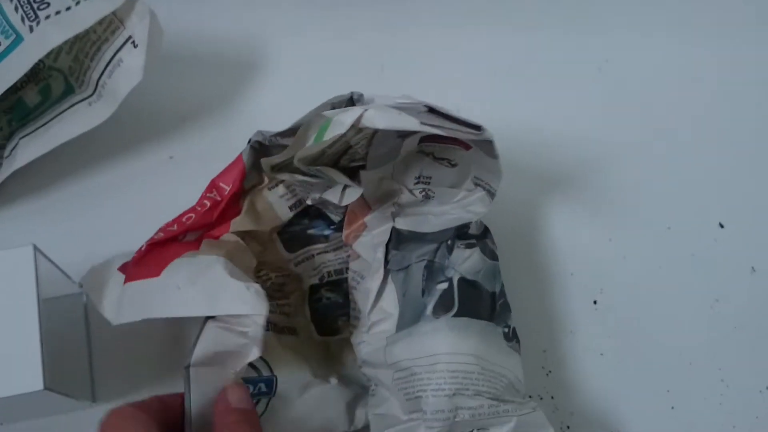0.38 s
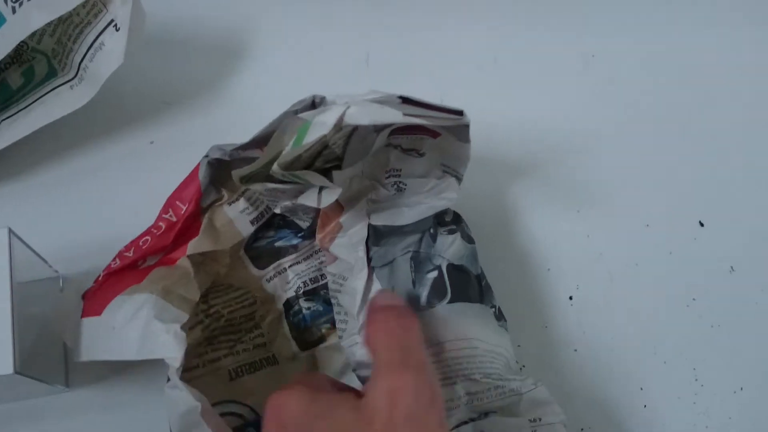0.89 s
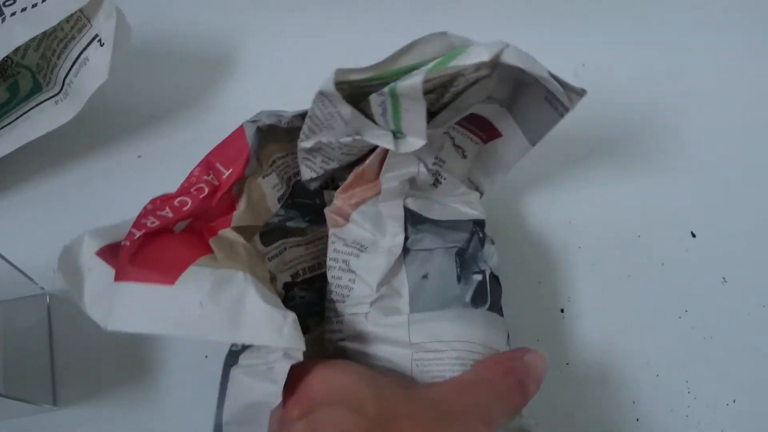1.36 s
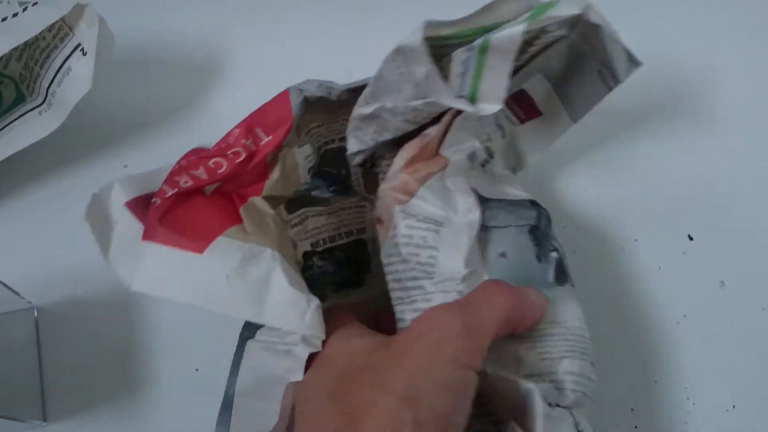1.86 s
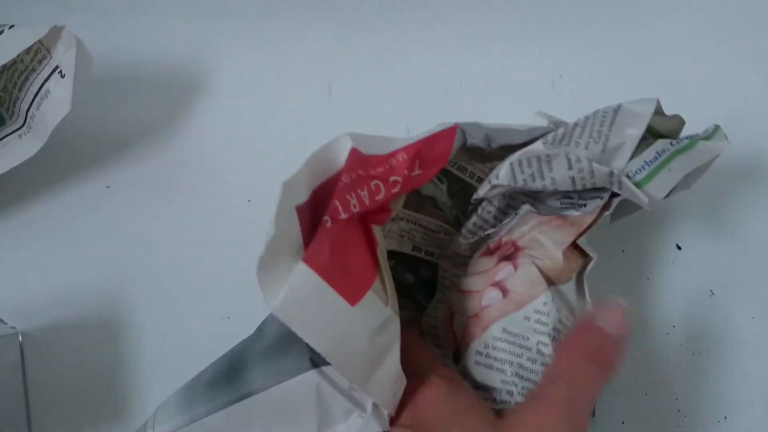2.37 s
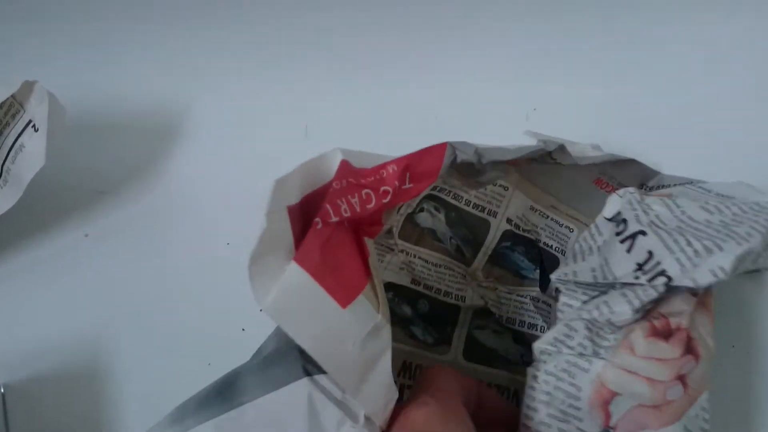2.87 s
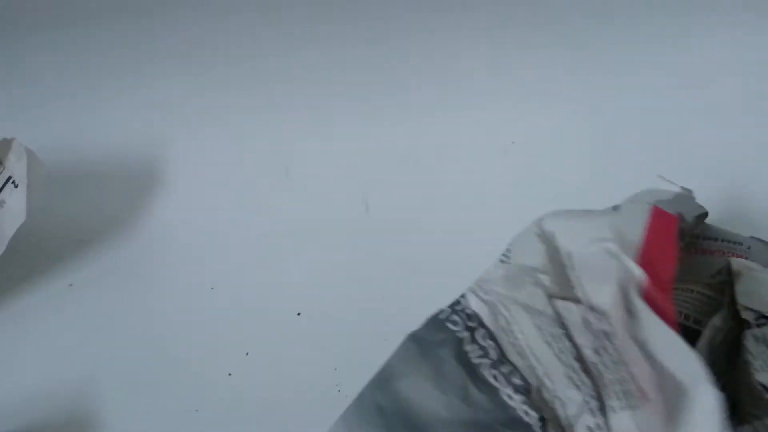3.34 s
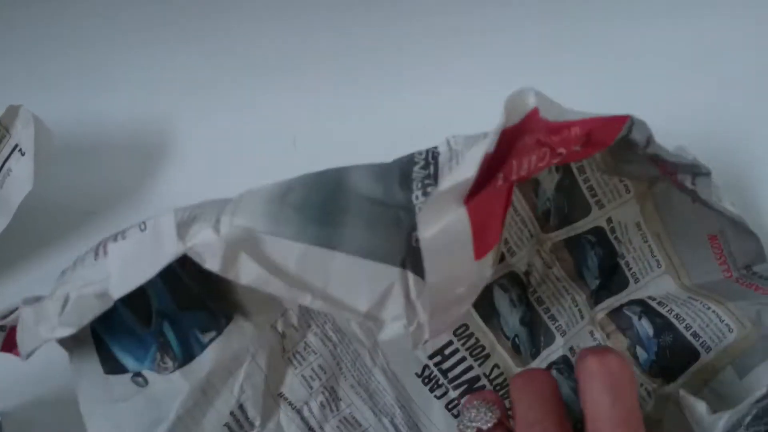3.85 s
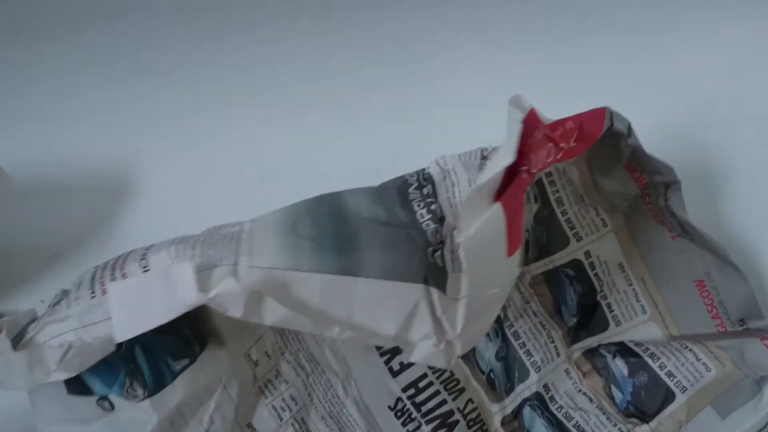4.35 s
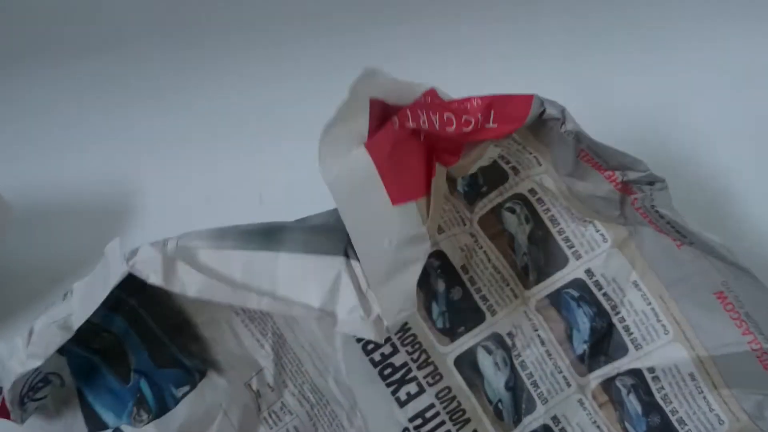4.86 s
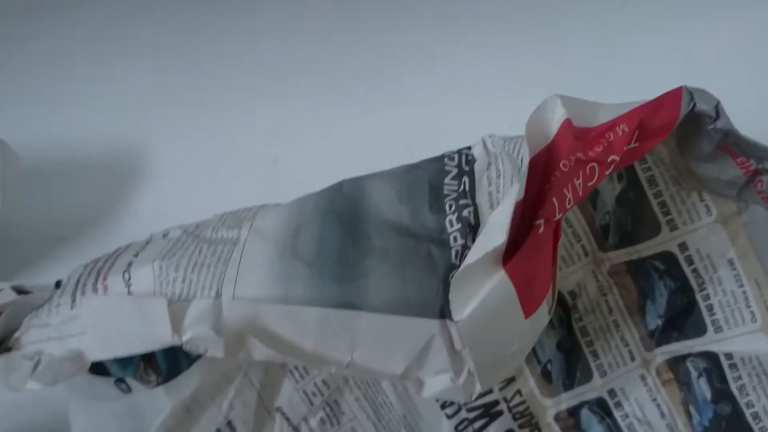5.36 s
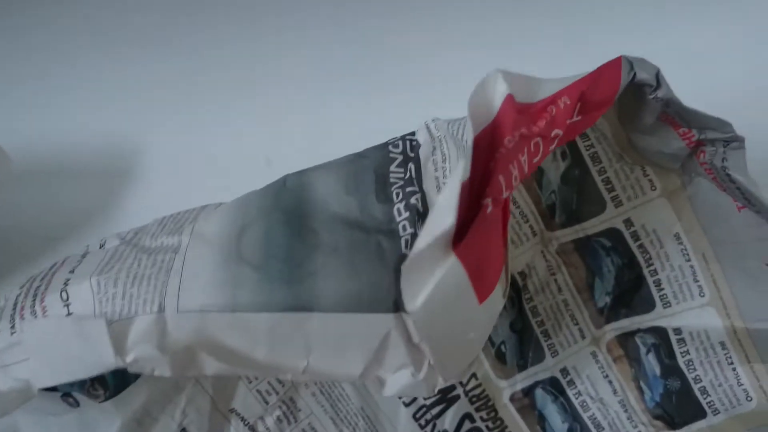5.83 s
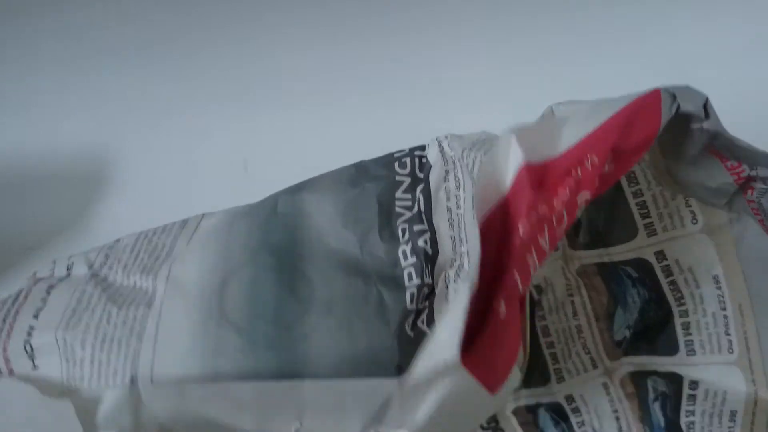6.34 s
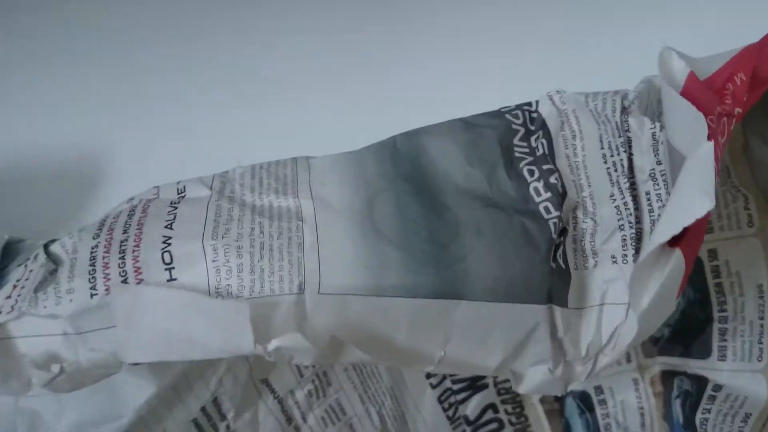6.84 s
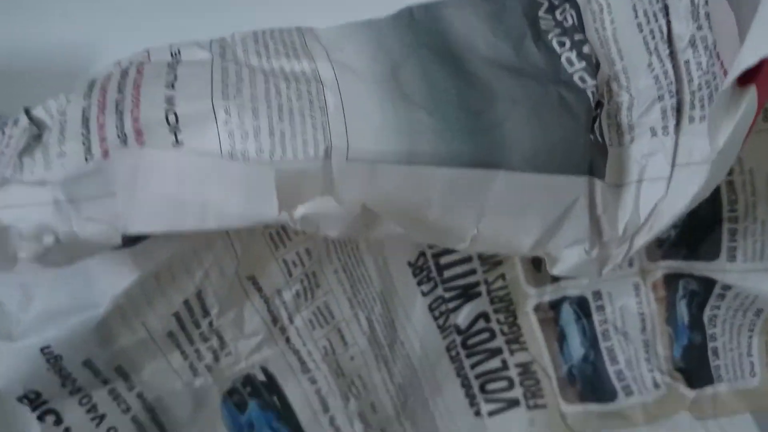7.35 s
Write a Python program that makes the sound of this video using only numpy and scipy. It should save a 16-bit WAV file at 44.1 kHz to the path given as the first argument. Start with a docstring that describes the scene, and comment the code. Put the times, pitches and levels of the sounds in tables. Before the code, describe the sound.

Hands unwrap crumpled newspaper up close, with sharp crisp snaps over dense crackle and rustle, plus low knocks on a hollow table top.

```python
"""Hands unwrap a parcel of crumpled newspaper on a hollow table top, close to two microphones, for 7.7 s.
Sharp snaps (buckling creases: short noise bursts) ride on crackle and rustle (noise that follows each tug).
Early on a few knocks boom low (fading sine waves); the snaps crowd together from about 2 s to 5.6 s.
The hollow note throughout is the paper noise through resonant filters. Strong knocks come at 5.3 s and 6.4 s,
a mid-pitched scrape at 6.2 s, and a run of dull bumps near the end, over quieter rustling."""
import sys
import numpy as np
from scipy import signal
from scipy.fft import rfft, irfft
from scipy.io import wavfile

SR = 44100
rng = np.random.default_rng(int(sys.argv[2]) if len(sys.argv) > 2 else 0)


def persist_wave(psi):
    """Save psi, clipped to +-1, as 16-bit WAV."""
    counts = np.round(np.clip(psi, -1, 1) * 32767).astype(np.int16)
    wavfile.write(sys.argv[1], SR, np.atleast_2d(counts).T)


def decibels_to_gain(level_db):
    """Convert a level in decibels to a linear amplitude gain (20 dB per decade)."""
    exponent = np.asarray(level_db, float) / 20
    return 10 ** exponent


N = 340011   # length in samples

# Large creases that buckle; levels are before CRACK_GAIN_DB:
# (time [s], peak level [dB], body re peak [dB], edge re peak [dB], pitch of the facet [Hz])
SNAPS = [(0.0157, -6, -35, -16, 2400), (0.0292, -11, -17.5, -23, 2480), (0.0434, -10.5, -14.5, -6.5, 2310),
         (0.2384, -25.5, -8, -21, 2100), (0.4389, -21, -5.5, -4, 3600), (0.4544, -10, -20, -1.5, 3550),
         (0.6401, -15.5, -19, -9, 3070), (0.886, -21, -15, -15, 2000), (0.9179, -17, -17.5, -6, 990),
         (0.9501, -4.5, -40, -13, 2930), (0.99, -19, -35, 3, 2000), (1.0992, -10.5, -21, -11, 3450),
         (1.111, -11.5, -18.5, -11, 2880), (1.2365, -0.5, -41, -10, 2820), (1.365, -21.5, -22, -7, 2100),
         (1.443, -18, -23, -23, 3580), (1.585, -39.5, 16.5, -23, 1330), (1.6613, -12, -22, -7, 3200),
         (1.847, -21, -20, -22, 2630), (1.8851, -24, -23, -2, 1390), (1.957, -21, -27, -4, 1870),
         (2.0354, -7, -18, -8, 2060), (2.0715, -3.5, -45, -1.5, 1240), (2.134, -16, -13.5, -5, 2530),
         (2.2223, -20, -35, -27, 3576), (2.2408, -2.5, -35, -38, 3380), (2.361, 0, -47.5, -28, 2300),
         (2.52, -28, -8, -24, 2000), (2.599, -9, -39, -25, 3550), (2.6225, -3, -30, -9.5, 726),
         (2.675, -4, -35, -41, 2500), (2.8201, -25.5, 1.5, -14, 770), (2.8378, -8, -22, -19, 2720),
         (2.8611, 7, -42.5, -30, 3810), (2.9148, -7, -41, -14, 2890), (2.9776, 0, -41, -14, 2930),
         (2.995, -4, -26.5, -16, 2400), (3.129, -14, -14, -19, 1900), (3.1396, -32.5, 6, -25, 720),
         (3.1987, -19, -10.5, -37, 2460), (3.3151, -3, -17.5, -22, 2920), (3.3297, -5.5, -31, -12, 3600),
         (3.4263, 2.5, -35.5, -25, 2430), (3.4728, -18.5, -6, 1, 1870), (3.6147, -0.5, -19, -8, 3800),
         (3.6314, -6.5, -22, -18, 2500), (3.638, -10, -18, -11, 1500), (3.6547, -6.5, -34, -9.5, 3470),
         (3.667, -10, -28, -10, 3000), (3.7865, -11.5, -18, -6.5, 2540), (3.805, -14, -26, -15, 1640),
         (3.8525, -10, -31, -34, 2240), (3.942, -36, -4, -27, 2000), (3.975, -27, -4, -25, 2300),
         (4.0103, -18, -19, -37, 2510), (4.1056, -23.5, -15.5, -3, 1690), (4.131, -29.5, -2.5, -29, 2400),
         (4.1854, -38, 4, -24, 2100), (4.272, -10, -23, -20, 1330), (4.3434, -6, -19.5, -22, 1290),
         (4.3746, -20, -8.5, -25, 1450), (4.394, -10, -21, -18, 1780), (4.4078, -14, -21, -43, 3530),
         (4.476, -34, 2, -30, 1350), (4.5149, -11.5, -15, -14.5, 2060), (4.541, -13.5, -21, -32, 1350),
         (4.6096, -10.5, -16, -30, 3220), (4.6323, 5, -38.5, -15.5, 1540), (4.6911, -9, -25.5, -14, 2440),
         (4.7457, -14.5, -16, -21, 2570), (4.7589, -13, -18, -10, 2910), (4.84, -22.5, -5, -27, 1390),
         (4.8565, -17.5, -16, -18, 2900), (4.8937, -3.5, -29, -14.5, 2180),
         (4.9227, -3.5, -25.5, -25, 1250), (4.9756, -28, -22, -34, 3080), (4.9952, -8, -20, -33, 1380),
         (5.002, 2, -28.5, -8, 2720), (5.008, 5.5, -45, -13, 3280), (5.0271, 0, -43.5, -14, 3740),
         (5.0892, -19, -17, -29, 3380), (5.1874, -22, -11, -34, 2560), (5.2822, -2.5, -23.5, -12, 2760),
         (5.3143, -15, -31, -34, 3300), (5.4767, -17.5, -15, -24, 2370), (5.5758, 0.5, -33.5, -29, 1990),
         (5.5985, -22, -10, -26, 1330), (5.6413, -9.5, -9, -29, 2260), (5.6864, -0.5, -32, -33, 3020),
         (5.914, -38, 12, -35, 676), (5.94, -38, 3, -32, 877), (5.971, -28, -14, -19, 1990),
         (6.1488, -26.5, -3, 3, 2630), (6.2286, -35, 1.5, -12, 2770), (6.2987, -37, -14, -25, 2440),
         (6.373, -23, -3.5, -5.5, 730), (6.4359, -14.5, -18.5, -28, 720), (6.4903, -5.5, -21.5, -25, 1800),
         (6.4995, -17, -6.5, -4, 1950), (6.6778, -46.5, 14, -26, 736), (6.712, -37, 6, -37, 1990),
         (6.7788, -8, -30.5, -37, 2340), (6.841, -28, -2, -7, 3430), (6.8807, -39, 4.5, -28, 2418),
         (6.9158, -36, -8, -6, 1640), (7.201, -51.5, 9, -12, 732), (7.252, -51, 16, -6, 711),
         (7.3233, -2, -33, -19, 2400), (7.4077, -18.5, -21.5, -55, 3450), (7.4832, -12.5, -19, -8, 716),
         (7.7004, -20.5, -13, -15, 1830)]
# Knocks on the table: (time [s], level before the mode levels [dB], time it rings freely [s],
# hardness [dB per octave], extra weight of the lowest mode [dB])
KNOCKS = [(1.092, -60.5, .3, 17.5, -2), (1.342, -32, 0.18, 10, 4), (1.567, -37, 0.15, 10.5, 9),
          (1.716, -51, 0.086, 12, 3), (2.371, -62, 0.057, 9, 0), (4.607, -61, 0.093, 14, 0),
          (5.029, -46.5, 0.043, 4, -2), (5.193, -45.5, .2, 11.5, 7), (5.288, -27.5, .086, -6.5, -3),
          (5.639, -46, 0.12, 13, 0), (5.9, -46.5, .13, 12, 7), (6.37, -21, 0.12, 7, -12),
          (6.548, -55, 0.097, 8, -5)]
# Ringing modes of the table top: (frequency [Hz], level [dB], ring time as a share of KNOCK_T60_S [ratio])
TABLE_MODES = [(72, -2.5, 0.38), (94.4, 9.5, 0.43), (126.4, -8, 0.44), (150.6, -9, 0.38), (225, -34, 0.79),
               (320, -27, 0.17), (392, -37, 0.88), (740, -49, 0.66)]
# What the moving paper sets humming in table and cupped sheet: (frequency [Hz], width [Hz], level [dB])
HOLLOWS = [(88, 34, 2), (328.5, 23, 0.5), (403, 38, 2), (694, 45, 6)]
# Microphones with their port resonances: (frequency [Hz], gain [dB])
LEFT_MIC = [(100, -11), (300, -31.5), (600, -22.5), (1200, -11), (1900, -10), (3200, -11.5), (4700, 0),
            (6000, -13.5), (8500, -18.5), (11000, -15.5), (13000, -22.5), (15500, -81)]
RIGHT_MIC = [(100, 3), (300, -31.5), (600, -20.5), (1400, -6), (3100, -5.5), (4200, -0.5), (4900, 0.5),
             (5500, 5), (7000, -12), (8500, -20), (11000, -24.5), (13500, -19.5), (15600, -10.5)]
# Rustle of the sheet between tugs: (time [s], level [dB], body re rustle before the lag and offset [dB],
# lift of the treble [dB])
RESTING = [(0, -34.5, -6.5, 8.5), (1, -35.5, -6.5, 8.5), (1.5, -30.5, -4.5, 4), (2.3, -27.5, -9, 2),
           (2.748, -96, -3, 6), (3.298, -25.5, -10, 3), (4.2, -39.5, -11.5, 2.5), (5.0, -38.5, -2, 6.5),
           (5.5, -32, -9, 6.5), (6.0, -49, -0.5, 6), (6.7, -53, -0.5, 10), (7.2, -77, 2, 11.5),
           (7.71, -66, -1.5, 8.5)]
# Tugs of the hands, each a bout of crackle: (time [s], level [dB], time held [s])
TUGS = [(0.0, -31, 0.018), (.24, -31, 0.11), (0.451, -25.5, 0.007), (.68, -52, .09), (.89, -33, 0.022),
        (1.169, -20.5, 0.072), (1.33, -29.5, 0.14), (1.56, -25.5, 0.011), (1.707, -23.5, 0.0033),
        (1.908, -18, 0.0033), (2.0, -30, 0.24), (2.463, -29.5, 0.026), (2.57, -26, 0.033),
        (2.639, -27.5, 0.0028), (2.86, -28, 0.008), (3.003, -31.5, 0.056), (3.1, -29, 0.067),
        (3.29, -24.5, 0.04), (3.39, -26.5, 0.06), (3.57, -20.5, 0.013), (3.645, -19, 0.036),
        (3.76, -29.5, 0.12), (4.0, -31.5, 0.042), (4.36, -33.5, .33), (4.909, -31, 0.005),
        (5.02, -34.5, 0.03), (5.26, -22, 0.086), (5.46, -24.5, 0.067), (5.62, -40, 0.087),
        (5.927, -37, 0.0029), (6.16, -42, 0.053), (6.38, -44, 0.029), (6.51, -35, 0.005), (6.6, -40, 0.16),
        (7.038, -40.5, 0.0039), (7.16, -49, 0.0055), (7.324, -38, 0.0019), (7.471, -38.5, 0.036),
        (7.71, -29, .01)]
# Dull bumps of a hand on the damped top: (time [s], level [dB], frequency [Hz])
BUMPS = [(3.14, -46, 76), (7.222, -46, 72), (7.457, -49, 70), (7.515, -48, 62), (7.543, -42.5, 89),
         (7.635, -50, 65), (7.687, -43, 76.4)]
# Mid-pitched scrape of the sheet over the top:
# (middle [s], half length [s], lift [dB], frequency [Hz], width [octaves])
SCRAPE = (6.2, .07, 17, 2800, 0.37)

ROOM_T60_S, ROOM_DB, AIR_DB = 0.24, -6, -53.5
TUG_RISE_DB_PER_S, TUG_FALL_DB_PER_S = 165, 221
BODY_LAG, USUAL_DB = 0.18, -36   # dB the body falls behind per dB of crackle above the usual level
PLAIN_BODY_DB, PLAIN_EDGE_DB = -8.5, -8.5   # tilt of an even crack
CRACK_GAIN_DB = 9.5   # drive of the fibres
KNOCK_T60_S = 0.81   # time to fall by 60 dB, before each mode's share
SPOT_DB = 1.2   # each knock lands elsewhere and weights the modes a little differently
BUMP_CYCLES = 0.54


def rms_one(x):
    """Scales a signal to an average strength (rms) of 1."""
    return x / np.sqrt(np.mean(x ** 2) + 1e-20)


def near(hz, centre_hz, octaves):
    """1 at the centre, falling off like a bell in pitch."""
    return np.exp(-.5 * (np.log2(hz / centre_hz) / octaves) ** 2)


def drift(rate_hz):
    """Slow random wandering with spread 1; a higher rate wanders faster."""
    r = np.exp(-80 * np.pi * rate_hz / SR)   # one slow value per 40 samples
    slow = signal.lfilter([1], [1, -2 * r, r * r], rng.standard_normal(N // 40 + 2002))[2000:]
    return np.interp(np.arange(N) / 40, np.arange(len(slow)), rms_one(slow))


def band(x, low_hz, high_hz):
    """Keeps the sound between two frequencies."""
    return signal.sosfilt(signal.butter(2, [low_hz, high_hz], "band", fs=SR, output="sos"), x)


def burst(marks, rise_s, fall_s):
    """Each mark opens an envelope that swells quickly and dies away."""
    up, down = np.exp(-1 / (rise_s * SR)), np.exp(-1 / (fall_s * SR))
    return signal.lfilter([(1 - up) ** 2], np.convolve([1, -2 * up, up * up], [1, -down]), marks + 1e-18)


def partly_shared_noise(alike):
    """Two sides of noise that have the given share of their power in common."""
    shared, *own = rng.standard_normal((3, N))
    alike = np.clip(alike, 0, 1)
    return np.sqrt(alike) * shared + np.sqrt(1 - alike) * np.array(own)


def sides(pan_db):
    """Left and right gains that differ by pan_db."""
    return decibels_to_gain(np.outer([.5, -.5], pan_db))


def room(x):
    """Close walls and the table top return a short diffuse tail, different on each side."""
    t = np.arange(SR // 2) / SR
    tail = rng.standard_normal((2, len(t))) * decibels_to_gain(-60 * t / ROOM_T60_S) * (t > .003)
    tail = tail / np.sqrt((tail ** 2).sum(axis=1, keepdims=True))
    return decibels_to_gain(ROOM_DB) * signal.fftconvolve(x, tail, axes=1)[:, :N]


def microphone(x, points):
    """A filter with the given response that never sounds ahead of its input (minimum phase)."""
    size = 4096
    hz, db = np.transpose(points)
    grid = np.maximum(np.arange(size // 2 + 1) * SR / size, 1)
    cepstrum = irfft(np.log(decibels_to_gain(np.interp(np.log(grid), np.log(hz), db))))
    cepstrum[1:size // 2] *= 2   # fold the later half onto the earlier
    cepstrum[size // 2 + 1:] = 0
    return signal.fftconvolve(x, irfft(np.exp(rfft(cepstrum))))[:N]


def handling():
    """Tugs swell, hold and fade over the resting rustle; harder tugs sound thinner."""
    t = np.arange(0, N + 64, 64) / SR
    s, rest_db, body_db, treble_db = np.transpose(RESTING)
    start, db, held_s = np.transpose(TUGS)[:, :, None]
    before_s, after_s = np.maximum(start - t, 0), np.maximum(t - start - held_s, 0)
    tug_db = db - TUG_RISE_DB_PER_S * before_s - TUG_FALL_DB_PER_S * after_s
    power = decibels_to_gain(2 * np.interp(t, s, rest_db)) + decibels_to_gain(2 * tug_db).sum(axis=0)
    level_db = 10 * np.log10(power)
    tilt_db = np.interp(t, s, body_db) - BODY_LAG * (level_db - USUAL_DB)
    curves = level_db, tilt_db, np.interp(t, s, treble_db)
    return [np.interp(np.arange(N) / SR, t, curve) for curve in curves]


def air_noise():
    """Faint steady hiss, separate on each side."""
    return decibels_to_gain(AIR_DB) * rng.standard_normal((2, N))


def shifting_arms():
    """Arms shift on the top: low noise that wanders in level and grows slightly with the handling."""
    shared, *own = rng.standard_normal((3, N))
    level_db = -50.5 + 3.5 * drift(7.1) + 0.14 * (handling()[0] - USUAL_DB)
    return band(decibels_to_gain(level_db) * (shared + .5 * np.array(own)), 30, 150)


def bumps():
    """A damped top gives each bump only a cycle or two."""
    t = np.arange(N) / SR
    out = np.zeros(N)
    for s, db, hz in BUMPS:
        around = slice(round((s - .06) * SR), round((s + .06) * SR))
        cycles = (t[around] - s) * hz
        out[around] += decibels_to_gain(db) * np.exp(-.5 * (cycles / BUMP_CYCLES) ** 2) * np.sin(-2 * np.pi * cycles)
    return out


def table_knocks():
    """Each knock rings the table's modes until a hand settles on the top; hard knocks favour the upper modes."""
    out, t = np.zeros((2, N + SR)), np.arange(SR // 2) / SR
    hz, mode_db, share = np.transpose(TABLE_MODES)[:, :, None]
    for s, db, free_s, hard_db, deep_db in KNOCKS:
        level_db = db + mode_db + hard_db * np.log2(np.maximum(hz / 95, 1))
        level_db = level_db + deep_db * (hz < hz[1]) + rng.normal(0, SPOT_DB, hz.shape)
        # a soft palm builds each ring over a few cycles, a hard knock at once
        swell = 1 - np.exp(-t * hz / 5.3 * decibels_to_gain(hard_db - 5))
        hand_db = np.minimum(5000 * np.maximum(t - free_s, 0) ** 2, 20.5)
        fading = swell * decibels_to_gain(level_db - 60 * t / (KNOCK_T60_S * share) - hand_db)
        # the parcel slaps flat
        thud = decibels_to_gain(db + 2.0 * hard_db - 15.5 - 60 * t / 0.44) * rng.standard_normal(len(t))
        thud = band(thud, 130, 800)
        for side, lag in enumerate([.35, -.35]):   # the top bends out of step under the two ports (radians)
            ring = (fading * np.sin(2 * np.pi * hz * t - lag)).sum(axis=0)
            out[side, round(s * SR):][:len(t)] += ring + thud
    return out[:, :N] * decibels_to_gain([[-1.5], [1.5]])


def scrape_lift():
    """The sheet drags over the top: a brief lift [dB] of the paper noise, with its pitch and width."""
    middle_s, half_s, lift_db, hz, octaves = SCRAPE
    return lift_db * np.exp(-.5 * ((np.arange(N) / SR - middle_s) / half_s) ** 2), hz, octaves


def hollow_hum(sheet):
    """Table and cupped sheet hum along with the paper: narrow resonances add a hollow note."""
    hum = 0
    for hz, width_hz, db in HOLLOWS:
        r = np.exp(-np.pi * width_hz / SR)
        poles = [1, -2 * r * np.cos(2 * np.pi * hz / SR), r * r]
        hum = hum + decibels_to_gain(db) * signal.lfilter([(1 - r * r) / 2, 0, (r * r - 1) / 2], poles, sheet.mean(axis=0))
    return hum


def crackle(per_s, spread_db, clump_db):
    """Small creases give way at random, in clumps, all over the sheet: times, sizes and places."""
    born = rng.random(N) < per_s * decibels_to_gain(clump_db * drift(14.0)) / SR
    sizes = decibels_to_gain(spread_db * np.minimum(rng.exponential(1, N), 3.0))
    return born * sizes * sides(rng.normal(0, 5.0, N))


def snaps(hz, fall_s, place):
    """Large creases in one band: brief cracks, tilted by body, edge and facet pitch."""
    s, peak_db, body_db, edge_db, ring_hz = np.transpose(SNAPS)
    tilt_db = (body_db - PLAIN_BODY_DB) * near(hz, 750, 1.93) + (edge_db - PLAIN_EDGE_DB) * near(hz, 11800, 0.55)
    facet_db = 9.4 * near(hz, ring_hz, 0.073)
    crack = np.zeros((2, N))
    crack[:, np.round(s * SR).astype(int)] = decibels_to_gain(peak_db + tilt_db + facet_db + CRACK_GAIN_DB) * place
    crack *= decibels_to_gain(2.2 * rng.standard_normal(N))   # every facet rings unevenly across the bands
    return burst(crack, 0.14 * fall_s, fall_s)


def paper():
    """Snaps, crackle and rustle as fibre noise, band by band; each small crease has a pitch of its own."""
    crackle_db, body_db, treble_db = handling()
    small = crackle(per_s=450.0, spread_db=4.0, clump_db=3.2)   # rate before clumping
    pitch_hz = 600 * 2 ** rng.uniform(0, 2.8, N)
    place, sway = sides(rng.normal(0, 2.06, len(SNAPS))), drift(85.0)
    gust = drift(9.0)   # the slide catches and lets go in all bands at once
    scrape_db, scrape_hz, scrape_octaves = scrape_lift()
    out, edges = 0, np.geomspace(250, 19000, 23)
    for low_hz, high_hz in zip(edges, edges[1:]):
        hz = np.sqrt(low_hz * high_hz)
        fall_s = 0.0024 * (hz / 4000) ** -.4   # high bands die sooner
        grains = rms_one(burst(small * decibels_to_gain(15.4 * near(hz, pitch_hz, .8)), 0.0003, .6 * fall_s))
        rustle = (.4 + .35 * near(hz, 5000, .6)) * decibels_to_gain(0.8 * sway + 1.2 * gust + 2.0 * drift(12.0))
        shape_db = 2.0 * drift(4.0)   # the sheet's shape, and so its colour, keeps changing
        level_db = shape_db + crackle_db + (body_db + 12) * near(hz, 420, 1.42)
        level_db = level_db + treble_db * near(hz, 13000, 0.64) + scrape_db * near(hz, scrape_hz, scrape_octaves)
        envelope = snaps(hz, fall_s, place) + decibels_to_gain(level_db) * (grains + rustle)
        fibres = partly_shared_noise(alike=0.81 * near(hz, 620, 1.4))
        out = out + band(envelope * fibres, low_hz, high_hz)
    return out + hollow_hum(out)


def scene():
    """Paper in the room with faint air noise, through the two ports; knocks come up through the table."""
    sheet = paper()
    air = sheet + room(sheet) + air_noise()
    low = table_knocks() + bumps() + shifting_arms()
    low = signal.sosfilt(signal.butter(2, 35, "high", fs=SR, output="sos"), low)
    return np.array([microphone(air[0], LEFT_MIC), microphone(air[1], RIGHT_MIC)]) + low


def low_pass(x):
    """Removes everything above the highest recorded frequency."""
    return signal.sosfilt(signal.butter(12, 17000, fs=SR, output="sos"), x)


def record(dry):
    """The extreme treble is cut, then anything beyond full scale clips."""
    treble_cut = signal.cheby2(10, 50, 15900 * 1.05, fs=SR, output="sos")   # 50 dB down from this frequency [Hz]
    mix = np.clip(signal.sosfilt(treble_cut, dry), -1, 1)
    return low_pass(mix)


dry = scene()
out = record(dry)
persist_wave(out)
```